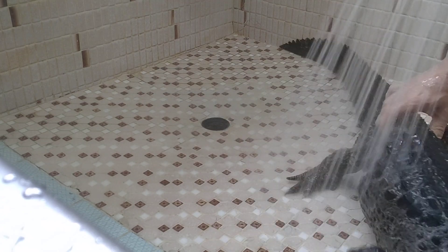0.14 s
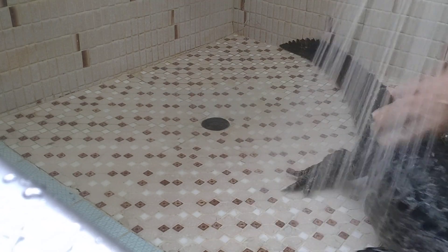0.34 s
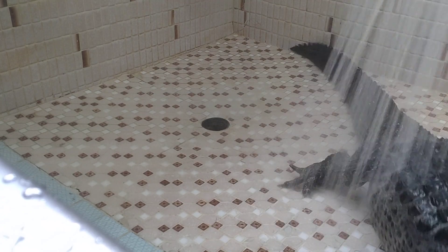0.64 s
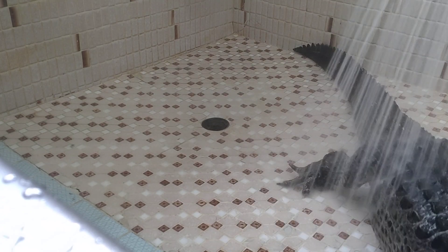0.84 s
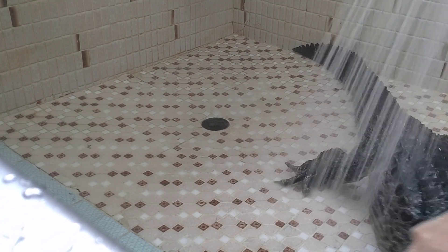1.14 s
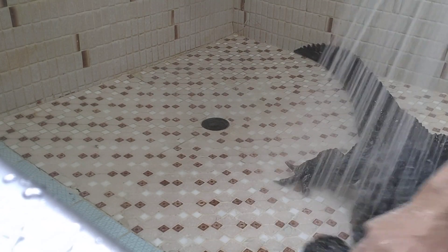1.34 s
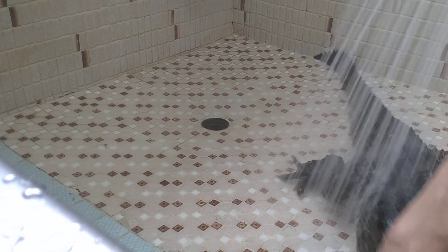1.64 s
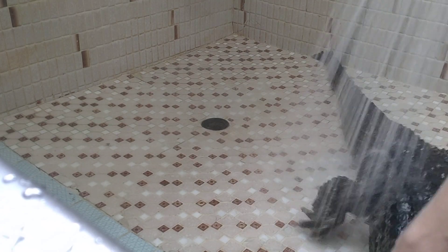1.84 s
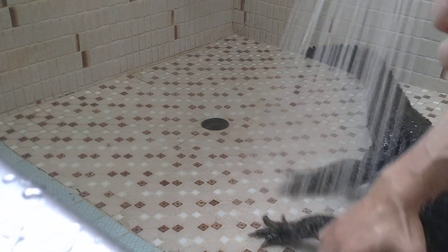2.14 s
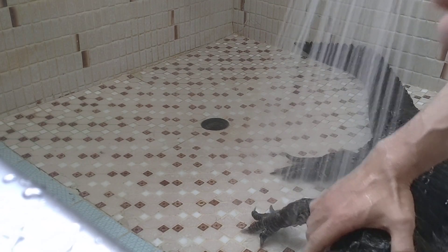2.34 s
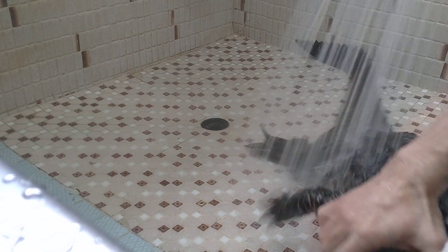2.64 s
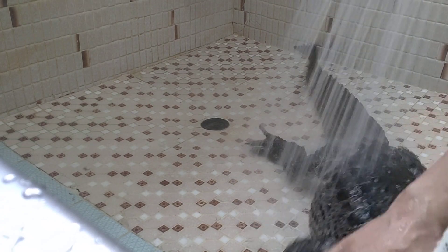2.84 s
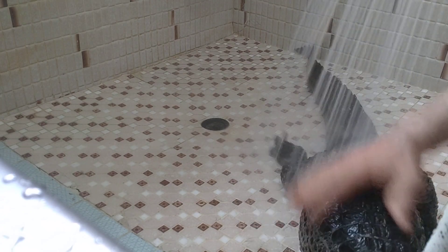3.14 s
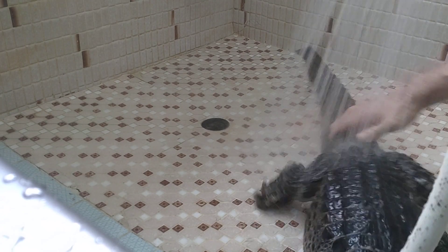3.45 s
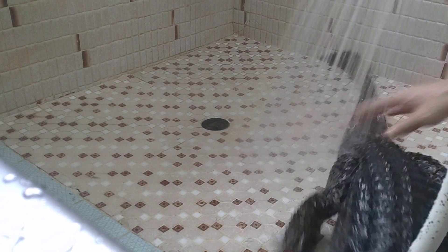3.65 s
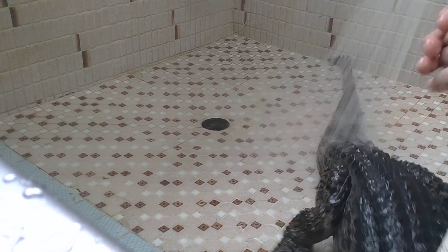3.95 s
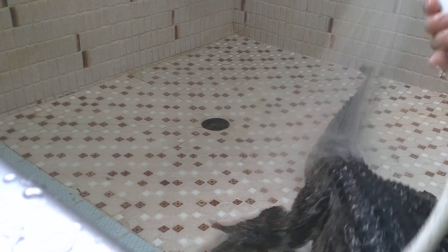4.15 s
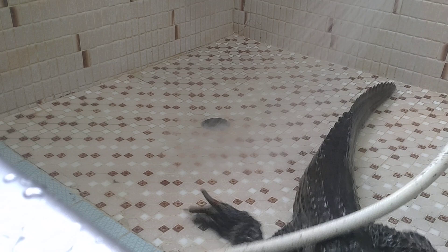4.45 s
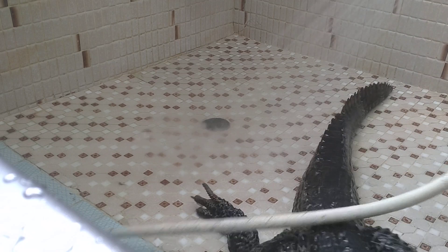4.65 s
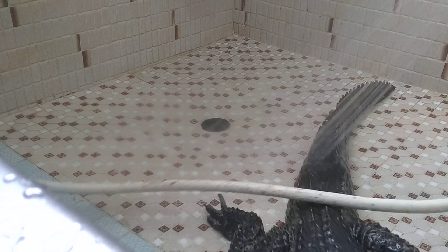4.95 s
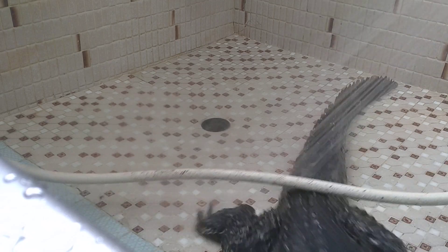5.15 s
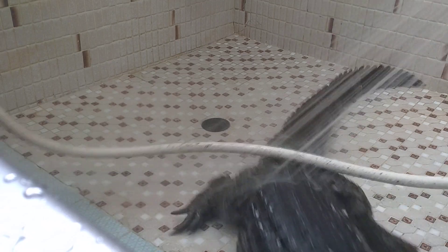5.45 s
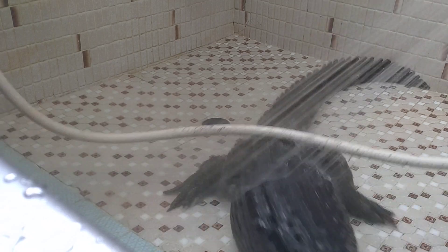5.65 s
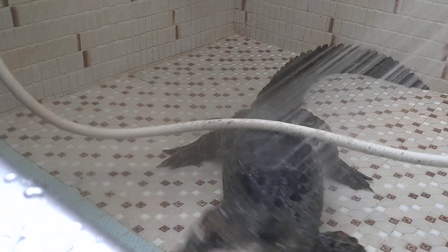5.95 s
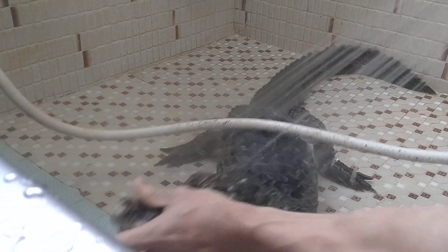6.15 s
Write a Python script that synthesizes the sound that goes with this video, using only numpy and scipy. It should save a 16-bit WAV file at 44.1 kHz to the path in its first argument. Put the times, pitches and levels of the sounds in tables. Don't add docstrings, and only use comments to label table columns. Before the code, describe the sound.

A bright, steady shower hiss fills a small tiled stall while claws tick and skid on wet tile and water drips.

```python
import sys
import numpy as np
from scipy import signal
from scipy.fft import rfft, irfft
from scipy.io import wavfile
from scipy.ndimage import uniform_filter1d, minimum_filter1d

SR = 44100
rng = np.random.default_rng(int(sys.argv[2]) if len(sys.argv) > 2 else 0)


def transcribe(u):
    v = np.clip(np.atleast_2d(u).T, -1, 1)
    q = np.round(v * 32767).astype(np.int16)
    wavfile.write(sys.argv[1], SR, q)


def elevation(decibels):
    levels = np.asarray(decibels, float)
    return 10 ** (levels / 20)


N = 277389

# frequency in Hz, left-right likeness from 0 to 1.
LIKENESS = [(60, 0.35), (130, 0.76), (290, 0.87), (640, 0.38), (1410, 0.0), (3100, 0.053), (6820, 0),
            (15000, 0.13)]
# frequency in Hz, level in dB.
LEFT_PORT = [(40, -41), (120, -43.5), (250, -38.5), (450, -24.5), (750, -20), (1300, -19), (2600, -9.5),
             (5200, -10.5), (7800, -4), (9000, 0), (10100, -8), (12300, -8.5), (14200, 0), (15600, -7.5)]
# frequency in Hz, level in dB.
RIGHT_PORT = [(40, -40), (120, -45), (250, -36), (750, -17), (2000, -10.5), (3500, -5), (5100, 2),
              (6300, -3.5), (7400, -10), (8800, -44), (10000, -13), (12000, 1.5), (14000, -7),
              (15600, -0.5)]
LEFT_RIGHT = np.array([[0.5], [-0.5]])


def rms_one(x):
    return x / np.sqrt(np.mean(x ** 2) + 1e-20)


def at_hz(points, hz):
    point_hz, value = np.array(points).T[:2]
    return np.interp(np.log(hz), np.log(point_hz), value)


def drift(rate):
    r = np.exp(-80 * np.pi * rate / SR)
    coarse = rng.standard_normal(N // 40 + 2002)
    slow = signal.lfilter([1], [1, -2 * r, r * r], coarse)[2000:]
    return np.interp(np.arange(N) / 40, np.arange(len(slow)), rms_one(slow))


def resonate(x, hz, width_hz):
    r = np.exp(-np.pi * width_hz / SR)
    poles = [1, -2 * r * np.cos(2 * np.pi * hz / SR), r * r]
    return signal.lfilter([(1 - r * r) / 2, 0, (r * r - 1) / 2], poles, x)


def widen(mid, side, alike):
    return np.sqrt(1 + alike) * mid + np.sqrt(1 - alike) * side * [[1], [-1]]


def add(out, s, sound):
    i = max(round(s * SR), 0)
    out[:, i:i + sound.shape[1]] += sound[:, :N - i]


def at_source(db, hz):
    heard = np.hypot(elevation(at_hz(LEFT_PORT, hz)), elevation(at_hz(RIGHT_PORT, hz)))
    return elevation(db) / heard


def spray_hold():
    # time in seconds, nearness in dB, share on scales in dB,
    # share in the pool in dB, left-right aim in dB.
    hold = [(0.0, -2, 6.5, 11.5, 5.5), (.25, 2, 2, 0, -2.5), (.55, 1.55, -0.3, -0.5, -4.5),
            (1.1, 1.24, -0.6, -0.5, -2.5), (1.4, 2.5, 3.5, 2.5, -2.1), (1.55, 0, 0, 0, 4.5),
            (1.9, 2, 1.5, -0.3, -4), (2.07, 0.5, 4.5, 5, 6.5), (2.3, 1, 2, 2.5, -8),
            (2.5, 0.46, 2.5, 1.5, -1.5), (3.55, 0.7, 1, 0.5, -1.7), (3.95, 4.5, -0.1, -3.5, -4.5),
            (4.35, 2.5, -0.1, 0.8, -2.5), (4.6, 4, 2, 3, -7), (4.9, 5, 3.5, 3, -2.5),
            (5.25, 3, 2.1, -2.3, -3.5), (5.5, 0.35, -1.5, 3.5, -2.5), (6.29, 0, -0.8, 4.5, -0.2)]
    # time in seconds, #
    # half length in seconds, overall level in dB, share on scales in dB, share in the pool in dB.
    swings = [(0.0, 0.046, 2, 5, 2.5), (0.08, 0.073, -3, 1.1, 2.1), (.33, 0.035, 1.1, -1, -1),
              (.38, .04, -0.4, 1, 1), (0.723, 0.061, 0.8, -0.7, -1), (.96, 0.06, -0.3, 2, 1.5),
              (1.317, 0.027, 3.5, 2.1, -5), (1.446, 0.025, 1.5, -2, -2), (1.61, 0.043, -0.8, 2.5, 2.5),
              (1.782, 0.049, -0.5, 0, 1), (1.964, 0.021, -1, .1, -9), (2.053, .04, 2.5, -2.5, 2.1),
              (2.125, 0.066, -4, 1, 3), (2.183, 0.097, 1.6, -1.5, 1.5), (2.647, .05, 1.5, -3, 5),
              (2.91, 0.068, 1.5, -2.8, 0.5), (3.25, 0.15, 1.2, -2, -1.3), (3.795, 0.041, -0.3, .1, -1.1),
              (4.086, 0.11, -0.5, -4.5, 1.3), (4.283, 0.051, -1, 1.1, 8.5), (4.534, 0.12, 2.5, 1.1, -2.8),
              (4.65, .04, -1.5, 3.5, 1.5), (5.053, 0.13, -.6, -3, -4), (5.72, 0.24, 1.1, 2, -0.5)]
    t = np.arange(N) / SR
    s, *columns = np.transpose(hold)
    held = np.array([np.interp(t, s, column) for column in columns])
    for at, half, *swing_db in swings:
        near = slice(max(int((at - 2 * half) * SR), 0), int((at + 2 * half) * SR))
        bell = np.exp(-2 * ((t[near] - at) / half) ** 2)
        held[:3, near] += np.outer(swing_db, bell)
    return held


def drops(size_db, per_s):
    sizes = elevation(size_db * np.minimum(rng.exponential(1, (2, N)), 5)) * rng.choice([-1, 1], (2, N))
    born = rng.random((2, N)) < per_s * elevation(3.0 * drift(25)) / SR
    return rms_one(sizes * born)


def spray(patchy_db):
    layer_hz = (2170, 2680, 5600, 12900)
    # time in seconds, level in dB.
    runoff_level = [
        (0, 0.4),
        (1.0, 0.1),
        (1.8, 1.2),
        (2.2, -2),
        (3.5, 0.8),
        (4.7, -0.3),
        (5.1, -2),
        (5.7, -1),
        (6.29, -1.1),
    ]
    wash_db, drops_db = -20.5, -26.5
    mist, patter, splash, pan = spray_hold()
    runoff = np.interp(np.arange(N) / SR, *np.transpose(runoff_level))
    runoff = runoff + 0.59 * splash + 0.42 * patter
    white = rng.standard_normal((2, 2, N))
    impacts, together = drops(size_db=3.0, per_s=1800), drift(7)
    out = 0
    edges = 25 * 2 ** (np.arange(29) / 3)
    for k, (low, high) in enumerate(zip(edges, edges[1:])):
        hz = np.sqrt(low * high)
        alike = np.clip(at_hz(LIKENESS, hz), 0, 1)
        mid, side = white[k % 2] * np.sqrt(0.5)
        source = elevation(wash_db) * widen(mid, side, alike) + elevation(drops_db) * (1 - alike) * impacts
        band_pass = signal.butter(2, [low, high], "band", fs=SR, output="sos")
        band = signal.sosfilt(band_pass, source)
        runoff_share, splash_share, patter_share = [at_hz(list(zip(layer_hz, row)), hz)
                                                    for row in np.eye(4)[:3]]
        level_db = mist + runoff_share * runoff + splash_share * splash + patter_share * patter
        level_db = level_db + patchy_db * (0.19 * together + drift(10.6))
        out = out + band * elevation(level_db + (splash_share + patter_share) * pan * LEFT_RIGHT)
    stirred = bubbles(35 * elevation(mist + splash), level_db=-44.0, cycles=50.4)
    return out + elevation(mist + runoff) * stirred


def bubbles(per_s, level_db, cycles):
    out = np.zeros((2, N))
    busy = np.clip(per_s / per_s.max(), 0, 1)
    tries = 600
    for when, keep, size, loud, side in rng.random(size=(tries, 5)):
        if keep < busy[int(when * N)] * per_s.max() * N / SR / tries:
            hz = 600 * 6.0 ** size
            t = np.arange(int(cycles * SR / hz)) / SR
            ring = np.sin(2 * np.pi * hz * t * (1 + 0.029 * t / t[-1]))
            blip = ring * np.sin(np.pi * t / t[-1]) ** 2
            add(out, when * N / SR, elevation(level_db + 6.25 * loud) * elevation(7 * side * LEFT_RIGHT) * blip)
    return out


def claws():
    # start in seconds, peak level in dB, centre frequency in Hz,
    # left-right skid in dB, skid over tick in dB.
    strikes = [(0.0034, -23, 5070, 13, -17), (1.2968, -24.5, 6030, 0, -7.5), (1.4494, 0.5, 5240, -12, -25),
               (1.59, -12, 4700, -11, -18.5), (1.9186, -12, 5380, -9, -24), (1.945, -13.5, 5600, -14, -7),
               (2.0166, -9, 5400, 9, -17), (2.2662, -10, 4800, -11, -14.5), (2.2963, -14, 4930, -5, -11.5),
               (2.6408, -9.5, 4970, -17, -17), (3.219, -18.5, 4450, -4.0, -22),
               (3.812, -17, 5030, -13, -12), (3.9938, -17.5, 5460, -23, -12),
               (4.008, -12, 5100, -19, -12.5), (4.098, -12.5, 4840, -15, -19),
               (4.2587, -15.5, 4770, -10, -14.0), (4.4092, -18, 4330, -6.0, -20),
               (5.5674, -12.5, 5090, -11, -25)]
    slip_samples, skid_t60_s = 70, 0.23
    out, t = np.zeros((2, N)), np.arange(SR // 4) / SR
    for s, peak_db, hz, pan_db, skid_db in strikes:
        slip_db = 2.84 * rng.standard_normal(len(t))[np.arange(len(t)) // slip_samples]
        grit = rng.standard_normal((2, len(t))) * elevation(slip_db)
        skid = elevation(skid_db) * rms_one(resonate(grit, hz, 0.39 * hz) + 0.4 * grit)
        skid = skid * elevation(-60 * t / skid_t60_s) * (1 - np.exp(-t / 0.0009))
        skid = skid * elevation((pan_db + 12.0) * LEFT_RIGHT)
        rebounds = 0.2 * rng.standard_normal(len(t)) * np.exp(-t / 0.0015)
        tick = resonate((t == 0) + rebounds, hz, 0.45 * hz)
        sound = skid + tick / abs(tick).max() * [[0.5], [1]]
        add(out, s, at_source(peak_db + 10.5, hz) * sound)
    return out


def contacts():
    # start in seconds, peak level in dB, contact in seconds,
    # hardness in dB per octave.
    bumps = [
        (1.42, -39.5, 0.11, -2),
        (1.793, -33.5, 0.054, 0.8),
        (1.845, -39, 0.077, -7),
        (4.254, -41, 0.025, 8.5),
    ]
    # frequency in Hz, level in dB, share of the contact, lag in seconds,
    # left-right in dB.
    wall = [(733, 2.3, 0.74, 0.004, -2), (1020, -10, .6, 0, 1), (1103, -5.5, 1.2, 0.012, 5),
            (1420, -5, 0.8, 0.0013, 12), (1980, -4, 1.1, 0.012, -4)]
    # start in seconds, peak level in dB, contact in seconds.
    drags = [
        (4.195, -64, .05),
        (4.245, -62, .04),
        (4.295, -59, .07),
        (4.45, -65, .05),
        (4.53, -59, 0.076),
        (4.62, -63, .04),
        (4.689, -53, 0.14),
        (4.815, -51, 0.077),
        (4.915, -63, .08),
    ]
    # frequency in Hz, level in dB, share of the contact, lag in seconds,
    # left-right in dB.
    sill = [(79, -14, 1.01, .03, -2), (175, .1, 1.3, 0.0013, -6.5), (662, 3, 0.34, 0.0019, -2)]
    # start in seconds, #
    # peak level in dB, frequency in Hz, length in seconds.
    drips = [(.03, -49.5, 465, .096), (0.546, -46, 1000, .04), (1.441, -55, 230, 0.068),
             (0.217, -43.5, 1245, .08), (0.346, -42, 923, 0.067), (0.852, -42.5, 1420, 0.11),
             (.95, -42, 1132, 0.05), (1.206, -39.5, 915, .07), (1.287, -37.5, 1710, .06),
             (1.82, -51, 283.6, 0.15), (2.642, -41, 1584, .11), (2.904, -42, 1720, 0.078),
             (3.16, -47, 967, .038), (3.316, -42, 1815, .06), (3.52, -45.5, 1280, .11),
             (3.578, -40.5, 1743, 0.054), (4.19, -45.5, 552, 0.066), (4.253, -32, 1010, 0.02),
             (4.482, -37.5, 1650, .06), (4.526, -51, 413, .04), (4.529, -48, 334, 0.068),
             (4.571, -44, 1143, 0.055), (4.734, -39, 1440, 0.19), (4.735, -46, 644, 0.16),
             (4.784, -48, 570, .05), (4.803, -41, 861, .11), (4.86, -34, 1485, 0.034),
             (6.044, -55.5, 389, 0.11)]
    # start in seconds, peak level in dB, frequency in Hz,
    # length in seconds, left-right in dB.
    squeaks = [(1.182, -29, 4090, .12, -5), (1.304, -29, 3890, .11, -5), (1.455, -17, 5200, 0.07, 4),
               (2.032, -28, 3520, 0.055, 10), (2.025, -35, 2310, 0.055, 5), (2.131, -34, 2310, 0.1, -2),
               (2.169, -23, 3880, 0.078, 0), (2.205, -23.5, 5000, .05, -1), (4.193, -37.5, 2850, 0.16, -11),
               (4.57, -33.5, 1873, 0.062, -7), (4.839, -29.5, 2046, .055, -5),
               (4.897, -33, 2066, 0.055, -7)]
    drip_pan_db = 0.5
    rings = []
    for s, db, length, hard_db in bumps:
        for hz, mode_db, share, lag, pan_db in wall:
            peak_db = db + mode_db + hard_db * np.log2(hz / 730)
            rings.append((s + lag, peak_db, hz, share * length, pan_db))
    for s, db, length in drags:
        for hz, mode_db, share, lag, pan_db in sill:
            rings.append((s + lag, db + mode_db, hz, share * length, pan_db))
    return [*rings, *[(*drip, drip_pan_db) for drip in drips], *squeaks]


def knocks(width_share):
    out = np.zeros((2, N))
    for s, peak_db, hz, length, pan_db in contacts():
        t = np.arange(min(int((2 * length + 0.03) * SR), SR // 3)) / SR
        mid, side = rng.standard_normal((2, len(t)))
        alike = np.clip(at_hz(LIKENESS, hz) + 0.28, 0, 1)
        rubbing = widen(mid, side, alike)
        fed = rms_one(resonate(rubbing, hz, 20 + width_share * hz))
        clean = np.clip(1200 / hz, 0, 1)
        struck = clean * (np.sin(2 * np.pi * hz * t) + 0.24 * np.sin(2 * np.pi * 1.07 * hz * t))
        shape = (1 - np.exp(-t * hz / 2.0)) * elevation(-20 * (t / max(length, 0.01)) ** 1.65)
        ringing = shape * (0.63 * struck + (0.75 - 0.51 * clean) * fed)
        crack = resonate(rubbing * np.exp(-t / 0.0034), hz, 0.46 * hz) * np.sqrt(9000 / hz)
        gain = at_source(peak_db + 6.0, hz) * elevation(pan_db * LEFT_RIGHT)
        add(out, s, gain * (ringing + 0.64 * crack))
    return out


def stall(x):
    t60_s, level_db = 0.35, -7
    t = np.arange(SR // 3) / SR
    scatter = rng.standard_normal((2, len(t))) * elevation(-60 * t / t60_s) * (t > 0.004)
    scatter = scatter / np.sqrt(np.sum(scatter ** 2, axis=1, keepdims=True))
    return x + elevation(level_db) * signal.fftconvolve(x, scatter, axes=1)[:, :N]


def scene():
    # frequency in Hz, width in Hz, share of the spray.
    stall_modes = [(179.5, 10.5, 1), (295, 5, 0.11), (424, 51, 0.45), (522, 14, 0.44), (722, 11, 0.33),
                   (1070, 15, 0.16), (1420, 7.9, 0.092)]
    water = spray(patchy_db=0.82)
    standing = sum(share * resonate(water, hz, width_hz) for hz, width_hz, share in stall_modes)
    return water + standing + stall(claws() + knocks(width_share=0.084))


def port(x, colour):
    hz = np.linspace(1, SR / 2, 4097)
    cepstrum = irfft(np.log(elevation(at_hz(colour, hz))))
    cepstrum[1:4096] *= 2
    cepstrum[4097:] = 0
    return signal.fftconvolve(x, irfft(np.exp(rfft(cepstrum))))[:N]


def limiter(x):
    ceiling_db, look_ahead_s, recover_db_per_s = -5.0, 0.009, 150
    ahead, ramp = round(look_ahead_s * SR), recover_db_per_s * np.arange(N) / SR
    over_db = np.maximum(20 * np.log10(abs(x) + 1e-9) - ceiling_db, 0)
    early_db = -minimum_filter1d(-over_db, size=2 * ahead + 1)
    held_db = np.maximum.accumulate(early_db + ramp, axis=1) - ramp
    return x * elevation(-uniform_filter1d(held_db, size=45))


def band_limit(x):
    return signal.sosfilt(signal.butter(12, 16450, fs=SR, output="sos"), x)


def record(dry):
    ports = np.array([port(dry[0], LEFT_PORT), port(dry[1], RIGHT_PORT)])
    top_cut = signal.ellip(12, 0.5, 75, 15800, fs=SR, output="sos")
    return band_limit(signal.sosfilt(top_cut, limiter(ports)))


dry = scene()
out = record(dry)
transcribe(out)
```